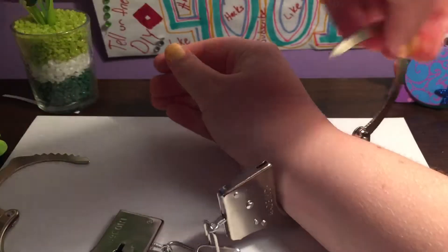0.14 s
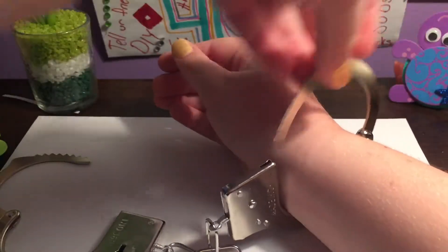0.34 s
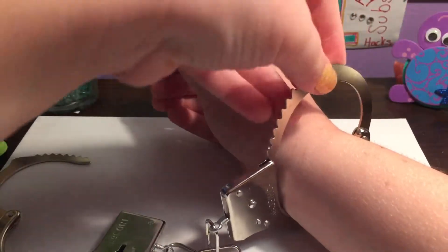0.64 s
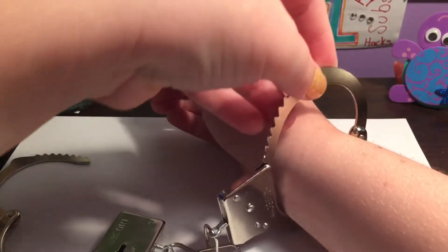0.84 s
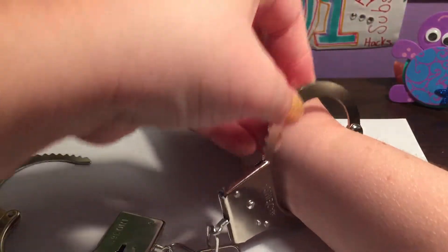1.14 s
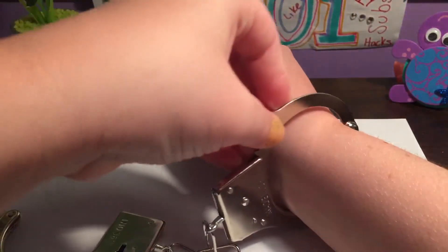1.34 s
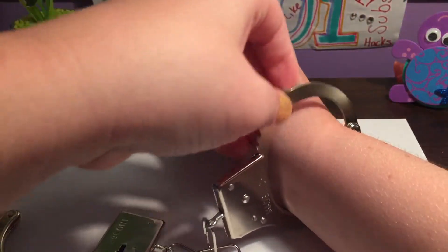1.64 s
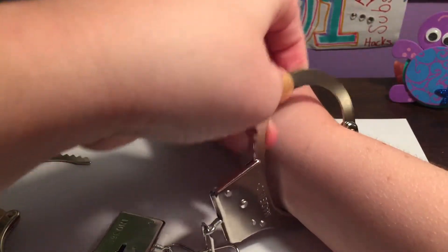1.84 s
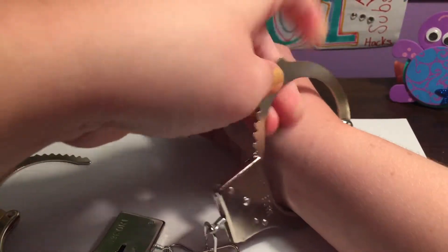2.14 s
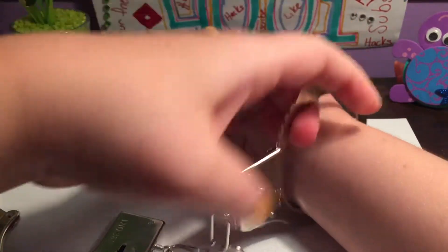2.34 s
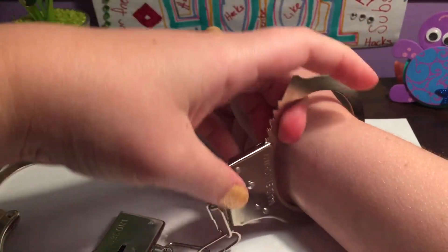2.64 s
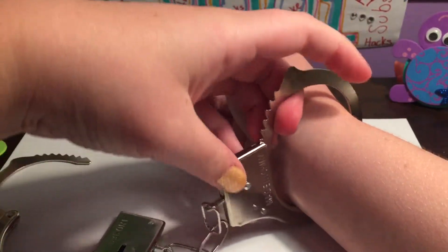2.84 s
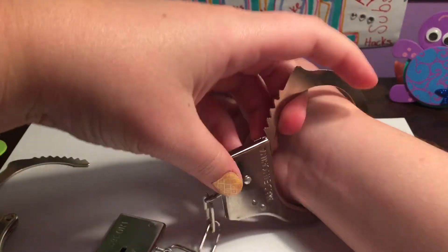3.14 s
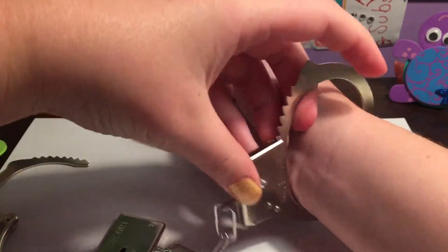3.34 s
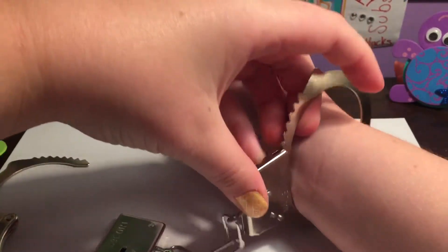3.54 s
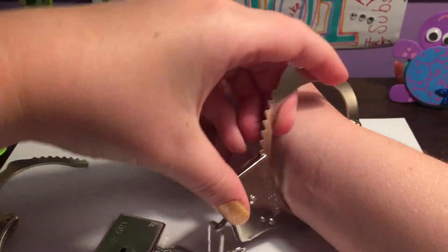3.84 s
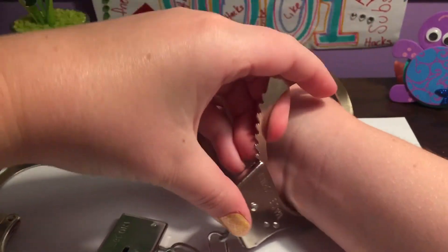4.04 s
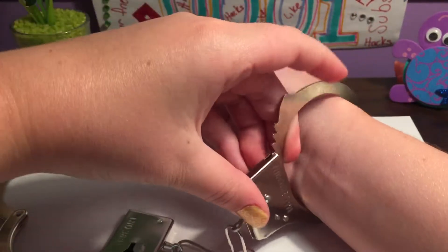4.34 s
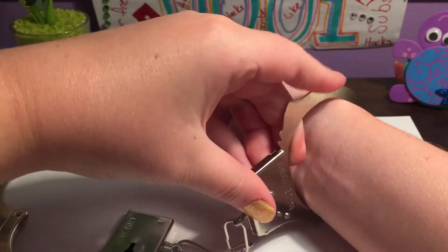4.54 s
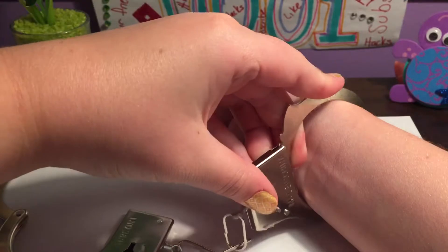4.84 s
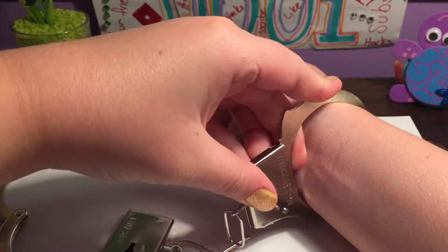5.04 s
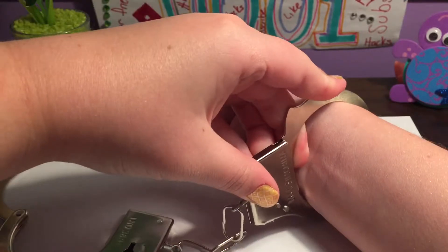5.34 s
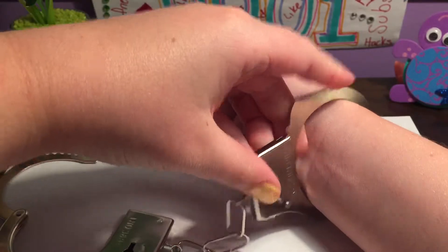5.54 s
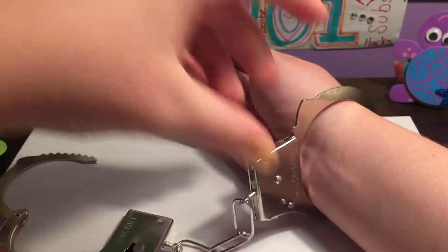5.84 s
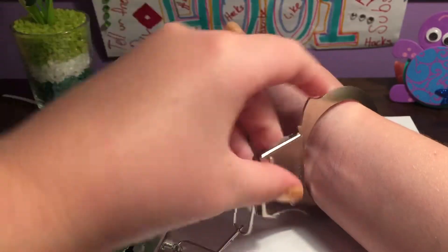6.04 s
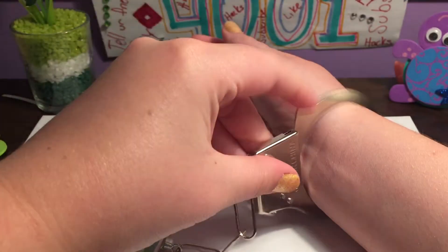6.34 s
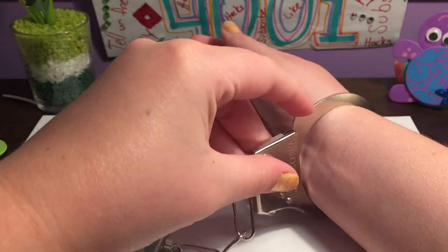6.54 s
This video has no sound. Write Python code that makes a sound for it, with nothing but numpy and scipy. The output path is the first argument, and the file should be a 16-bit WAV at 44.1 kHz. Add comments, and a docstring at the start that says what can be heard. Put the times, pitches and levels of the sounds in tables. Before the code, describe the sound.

Close-up metal clicking and chain rattling as a toothed cuff is ratcheted shut, with a loud snap and later a second, in a quiet humming room.

```python
"""A small room with a desk: steel handcuffs are closed round a wrist, close to the listener.
The toothed bow scrapes and squeaks by stick-slip; pawl and lock case click, clack and twice snap home
hard, as noise bursts over decaying modes. Chain links clink in chattering bounces or sing on one note,
and dull knocks excite the desk. Behind them are filtered fan noise with a wavering low hum
and a faint low rumble that comes and goes."""
import sys
import numpy as np
from scipy import signal
from scipy.fft import rfft, irfft, next_fast_len
from scipy.io import wavfile
from scipy.ndimage import uniform_filter1d, map_coordinates

SR = 44100
rng = np.random.default_rng(int(sys.argv[2]) if len(sys.argv) > 2 else 0)


def put_to_file(sound):
    """Save the sound as 16-bit audio at rate SR, in the file named by the first command-line argument."""
    columns = np.atleast_2d(sound).T  # one column per channel
    safe = np.clip(columns, -1, 1)
    whole_steps = np.round(safe * 32767)
    wavfile.write(sys.argv[1], SR, whole_steps.astype(np.int16))


N = 295911

# modes of lock case and bow: (frequency [Hz], relative level [dB], t60 before damping [s])
CASE_MODES = [(943, -15.5, 0.05), (1320, 4, 0.039), (1570, -2.5, 0.069), (1845, -0.5, 0.087),
              (2425, -3, 0.067), (3110, -7.5, 0.074), (4045, -6, 0.043), (4040, 0.5, 0.044),
              (4490, 0.5, 0.0408), (5310, -4, 0.059), (5470, -13, 0.044), (6190, -10, 0.05),
              (7020, -3.5, 0.058), (6850, -11, 0.0537), (7340, -6.5, 0.055), (8500, 2, 0.037),
              (8940, -0.5, 0.0509), (9110, 5, 0.037), (9400, -5, 0.038), (9550, -3, 0.039),
              (9800, 1, 0.045), (11130, -8, 0.044), (11360, 0.5, 0.039), (12300, 3.5, 0.034),
              (13300, -3.5, 0.039), (13070, -8, 0.038), (15290, -5, 0.037)]
# spectrum of the crack of steel on steel: (frequency [Hz], relative density [dB per Hz])
CRACK_SPECTRUM = [(200, 2.5), (700, 4.5), (1100, 4), (1400, 6.5), (2300, 3), (3000, -3.5), (4000, 1),
                  (7000, 3.5), (9500, 0), (13000, -1.5), (16000, 1)]


def amp(db):
    """Amplitude ratio: 20 dB correspond to a factor of ten."""
    return 10 ** (np.asarray(db) / 20)


def unit(x):
    """Normalization by mean power: x at rms 1."""
    return x / np.sqrt(np.mean(x ** 2) + 1e-20)


def crest(x, size=88):
    """Normalization by short-time power: the loudest two milliseconds have rms 1."""
    return x / np.sqrt(uniform_filter1d(x ** 2, size, mode="constant").max())


def along(points, hz):
    """Interpolation of (frequency [Hz], value) points on a logarithmic frequency axis."""
    f, v = np.transpose(points)
    return np.interp(np.log(hz + 1), np.log(f + 1), v)


def filtered(x, response):
    """Linear filtering: the spectrum of x times a response of frequency."""
    m = next_fast_len(len(x) + SR // 10, real=True)
    spectrum = rfft(x, m) * response(np.fft.rfftfreq(m, 1 / SR))
    return irfft(spectrum, m)[:len(x)]


def noise(response, size):
    """Coloured noise: white noise shaped by a response, at rms 1."""
    return unit(filtered(rng.standard_normal(size), response))


def fade(t, t60):
    """Exponential damping: a decay of 60 dB in t60 seconds."""
    return np.exp(-np.log(1000) * t / max(t60, 1e-3))


def ring(modes, t, scatter_db):
    """Modal superposition: a blow at a new spot gives each mode a new strength and phase."""
    total = np.zeros(len(t))
    for hz, db, t60 in modes:
        strength = amp(db + scatter_db * rng.standard_normal())
        total += strength * fade(t, t60) * np.sin(2 * np.pi * (hz * t + rng.random()))
    return total


def rough_ring(hz, t, t60, waver_hz):
    """Frequency modulation: the ring of a loose part wavers as it chatters against its seat."""
    pitch = hz + waver_hz * noise(lambda f: 1 / (1 + (f / 300) ** 4), len(t))
    return np.sin(2 * np.pi * np.cumsum(pitch) / SR) * fade(t, t60)


def spot(depth_db, size=72):
    """Modal selectivity: every contact spot on the steel favours other resonances."""
    ripple_db = depth_db * np.clip(rng.standard_normal(size), -1.8, 1.8)
    grid_hz = np.linspace(0, SR / 2, size)

    def colour(hz):
        ripple = np.interp(hz, grid_hz, ripple_db) * hz / (hz + 1000)  # flatter in the bass
        return amp(along(CRACK_SPECTRUM, hz) + ripple)
    return colour


def wobble(knots_per_s):
    """Slow random modulation: a smooth curve through random knots."""
    knots = np.arange(N) * knots_per_s / SR
    return map_coordinates(rng.standard_normal(int(knots[-1]) + 4), [knots])


def smooth_field(shape, bands, frames):
    """Correlated fluctuation: a random field smoothed over frequency and time, at rms 1."""
    over_bands = uniform_filter1d(rng.standard_normal(shape), size=bands, axis=0)
    return unit(uniform_filter1d(over_bands, size=frames, axis=1))


def patchy(x, depth_db):
    """Turbulent modulation: noise whose bands swell and sink independently."""
    z = signal.stft(x, nperseg=1024)[2]
    eddies = smooth_field(z.shape, bands=4, frames=9)
    return signal.istft(z * amp(depth_db * eddies), nperseg=1024)[1][:N]


def add(track, s, sound):
    """Superposition: mix a sound in at s seconds."""
    part = track[max(round(s * SR), 0):][:len(sound)]
    part += sound[:len(part)]


def in_room(x, wet_db):
    """Reverberation: a diffuse tail, damped by frequency, builds up over a few milliseconds."""
    # reverberation of the room: (frequency [Hz], t60 [s])
    room_decay = [(200, 0.43), (1500, 0.22), (6000, 0.21), (15000, 0.135)]
    hz, t, z = signal.stft(rng.standard_normal(SR // 3), SR, nperseg=256)
    decay = amp(-60 * t / along(room_decay, hz)[:, None])
    tail = signal.istft(z * decay * (1 - np.exp(-t / 0.0017)), SR, nperseg=256)[1]
    return x + amp(wet_db) * signal.fftconvolve(x, tail / np.linalg.norm(tail))[:len(x)]


def rumble():
    """Modulated narrow-band noise: a faint low rumble comes and goes."""
    mean_db, swing_db = -58, 3
    # course of the rumble before its random swing: (time [s], level against mean_db [dB])
    rumble_course = [(0, 3), (.3, 4.5), (.5, -3), (1.15, -10), (1.5, 1), (2.349, 6.5), (2.75, -3), (3.2, 6),
                     (3.45, -18), (3.9, 6), (5.4, -0.5), (6.7, 5.5)]
    course_db = np.interp(np.arange(N) / SR, *np.transpose(rumble_course))
    level_db = mean_db + course_db + swing_db * wobble(knots_per_s=4)
    # (frequency [Hz], relative density [dB per Hz])
    spectrum = [(20, -45.0), (40, -15.5), (57, 7.5), (74, -8.0), (95, 7), (140, -30.5), (400, -97.5)]
    return amp(level_db) * noise(lambda hz: amp(along(spectrum, hz)), N)


def fan():
    """Resonant flow noise: moving air hums in a few resonances, and its lowest hum wavers."""
    # rush of the fan: (frequency [Hz], relative density [dB per Hz])
    air_spectrum = [(20, -57), (56, -30), (80, -32.5), (110, -7), (165, 0), (250, -0.5), (360, -6.5),
                    (560, -18.5), (1000, -24), (1400, -28), (2400, -30.5), (3100, -35), (6000, -42.5),
                    (11000, -50.5), (16000, -54.5)]
    # resonances that the air excites: (frequency [Hz], width [Hz], lift [dB])
    duct_modes = [(107, 5.2, 6), (168.3, 33.6, 6), (342.8, 36, 9.5), (434.7, 19.4, 10), (670, 14, 6),
                  (872.4, 63.4, 15.5), (1001.4, 28, 13.5), (1670, 64, 8.5), (1862, 76, 16), (2182, 46, 11),
                  (2372, 35, 11.5), (2470, 90, 6)]

    def response(hz):
        lift_db = sum(db / (1 + (2 * (hz - c) / w) ** 2) for c, w, db in duct_modes)
        return amp(along(air_spectrum, hz) + lift_db)

    air = amp(-41.5) * unit(patchy(noise(response, N), depth_db=1.66))
    low = filtered(air, lambda hz: 1 / (1 + (hz / 230) ** 8))
    return air - low + low * amp(-0.8 * wobble(knots_per_s=13))


def knocks():
    """Damped impact: flesh softens the cuff's blow to wrist and desk; a heavy push thumps the arm."""
    # dull knocks: (time [s], relative level [dB], relative weight of the low thump [dB],
    # t60 of the hand's damping [s], softness cut-off [Hz])
    knock_events = [(3.566, -18.5, -15.5, 0.032, 720), (3.5765, -32, -12, 0.045, 560),
                    (4.739, -33, -10, 0.06, 500), (4.912, -28, 1, 0.16, 420),
                    (6.404, -21.5, -7.5, 0.15, 1100)]
    # modes of wrist and desk: (frequency [Hz], relative level [dB], t60 before damping [s])
    desk_modes = [(169.7, -9.5, 0.059), (261, -3, 0.045), (327, 6, 0.026), (451, -6.5, 0.022),
                  (526, -4.5, 0.25), (915, -2, 0.037), (1370, -3.5, 0.048)]
    out, t = np.zeros(N), np.arange(SR // 3) / SR
    for s, db, weight_db, t60, soft_hz in knock_events:
        thud = ring(desk_modes, t, scatter_db=1) * fade(t, t60) * (1 - np.exp(-t / .0015))
        soft_band = signal.butter(2, [140, soft_hz], "band", fs=SR, output="sos")
        thud = signal.sosfilt(soft_band, thud)
        thump = np.sin(2 * np.pi * 82 * t) * fade(t, 0.13) * (1 - np.exp(-t / 0.0074))
        knock = crest(thud) + amp(weight_db - 0.5) * thump
        add(out, s, amp(db - 0.5) * in_room(knock, wet_db=-14.0))
    return out


def pings():
    """Free vibration: a link that hangs clear of its neighbours rings on, nearly pure."""
    # singing links: (time [s], frequency [Hz], level [dB], t60 [s])
    ping_events = [(2.335, 8240, -53, .15), (2.51, 7028, -39, 0.19), (2.51, 9000, -42, 0.14),
                   (3.882, 5200, -56, 0.22), (4.057, 7500, -48, 0.26), (6.162, 8180, -48, 0.15)]
    out, t = np.zeros(N), np.arange(SR // 3) / SR
    for s, hz, db, t60 in ping_events:
        ping = rough_ring(hz, t, t60, waver_hz=25) * (1 - np.exp(-t / .001))
        add(out, s, amp(db) * ping)
    return out


def stirs():
    """Irregular excitation: the moving hand stirs links; rows of (time [s], level [dB], brightness [dB])."""
    # spells of stirring: (start [s], length [s], relative level before scatter [dB])
    stir_spells = [(3.858, 0.15, -46), (4.014, 0.32, -46.5), (4.493, 0.22, -52)]
    touches_per_s, scatter_db, bright_db = 22, 5.5, -18
    touches = []
    for start, length, db in stir_spells:
        count = max(round(length * touches_per_s), 1)
        for k, (late, strength) in enumerate(rng.random((count, 2))):
            s = start + length * (k + late) / count
            touches.append((s, db + scatter_db * (2 * strength - 1), bright_db))
    return touches


def chain():
    """Repeated impact: a link lands, then chatters on its neighbours in ever weaker bounces."""
    # links falling on each other: (time [s], relative level [dB], weight of the brightness curve [dB])
    clink_events = [(0.1, -44, 10), (0.111, -38.5, 8), (0.15, -47.5, 13), (0.229, -48.5, 3),
                    (2.495, -27, 13), (2.508, -21, 0), (2.5255, -24.5, 3), (2.975, -27, 15),
                    (3.021, -42, -31), (3.177, -32, -5), (3.189, -32, 4), (3.198, -25.5, 1),
                    (3.214, -26, 13), (3.479, -38, -2), (3.5362, -36, 1), (3.569, -35, -15),
                    (3.58, -33.5, -5), (3.836, -40, 3), (3.88, -40.5, 8), (4.02, -38, 5), (4.282, -41, 13),
                    (4.583, -46.5, -14), (5.508, -49.5, -5), (5.6365, -36, -12), (5.793, -52, 9),
                    (6.1609, -23, 13), (6.1654, -24.5, 10), (6.201, -38, 7), (6.565, -55, 9)]
    # modes of the links: (frequency [Hz], relative level [dB], t60 before damping [s])
    link_modes = [(4230, 1, 0.28), (4350, 3, 0.15), (5060, 7, 0.2), (5530, -22, .1), (6300, 8.5, 0.094),
                  (6660, 1, 0.075), (7028, 5.5, 0.18), (7500, -12, 0.56), (8040, 14.5, 0.055),
                  (8150, -12.5, 0.057), (8600, -5, .053), (9300, 2, 0.07), (9370, 7, 0.085),
                  (9700, -7, .05), (11500, 0.5, 0.15), (12200, -7, .1), (12700, 3, 0.057), (13600, -6, .13),
                  (13950, 4, .1), (14500, -11, .033)]
    rattle_s = .029  # all bounces fall within this time
    damp_t60_s = 0.15  # links lie against each other and the hand, which shortens their ring
    # (frequency [Hz], share of the brightness weight)
    brightness = [(3800, -0.12), (6300, 0.42), (12500, 0.7), (16000, 0.21)]
    out, t = np.zeros(N), np.arange(SR // 5) / SR
    for s, db, bright_db in clink_events + stirs():
        clink = np.zeros(len(t))
        for late in np.append(0, rng.random(size=6)):
            colour = spot(depth_db=4)
            tick = noise(lambda hz: colour(hz) * hz / (hz + 3000), len(t)) * fade(t, 0.036)
            tuning = 1 + .012 * rng.standard_normal()  # neighbouring links differ slightly
            tone = ring(link_modes, t * tuning, scatter_db=4) * fade(t, damp_t60_s)
            contact = crest(tone) + amp(2.5) * crest(tick)
            bounce_db = -12 * late - 5.6 * (late > 0)
            add(clink, late * rattle_s, amp(bounce_db) * contact)
        # a glancing touch is brighter than a flat one
        clink = filtered(clink, lambda hz: amp(bright_db * along(brightness, hz)))
        add(out, s, amp(db - 8.5) * crest(in_room(clink, wet_db=-15.5)))
    return out


def stroke(t, length):
    """Contact pressure: a push takes hold, swells to its peak and lets go."""
    grip_s, swell_db, release_t60_s = 0.006, 15, 0.11
    swell = amp(swell_db * (np.clip(t / length, 0, 1) - 1))
    return np.clip(t / grip_s, 0, 1) * swell * fade(np.maximum(t - length, 0), release_t60_s)


def scrape(slips_per_s=800, spread_db=5, jerk_db=2.0):
    """Sliding friction: steel advances on steel in tiny uneven slips that ring the bow."""
    # strokes of the bow in the lock case: (start [s], length of the push [s], relative level [dB])
    scrape_strokes = [(1.09, 0.045, -55), (1.139, 0.004, -50), (1.15, 0.032, -51.5), (1.183, .011, -51),
                      (1.204, 0.028, -43), (1.24, 0.0084, -54), (1.635, 0.059, -51), (1.868, 0.03, -38.5),
                      (1.895, 0.017, -52), (2.345, 0.026, -37.5), (2.385, 0.024, -43.5),
                      (3.145, 0.038, -41), (3.2, 0.04, -47), (3.948, 0.019, -50), (4.045, 0.036, -45.5),
                      (4.135, 0.027, -56), (4.21, 0.078, -53.5), (4.873, 0.0097, -51)]
    # resonances of the sliding bow: (frequency [Hz], width [Hz], relative level [dB])
    bow_modes = [(1870, 400, -12.5), (4500, 380, 4.5), (4820, 300, 4.5), (4910, 280, -3.5), (5530, 270, -9),
                 (6560, 120, -21.5), (7000, 200, -7), (8000, 188, -5.5), (8500, 550, -6.5), (9630, 150, 0),
                 (11440, 140, -6), (12300, 380, -10.5), (13270, 350, -4), (14150, 250, -16.5),
                 (15580, 200, -24)]
    t = np.arange(N) / SR
    pressure = sum(amp(db) * stroke(t - s, length) for s, length, db in scrape_strokes)
    jerks = amp(jerk_db * noise(lambda hz: 1 / (1 + (hz / 50) ** 4), N))  # the bow advances in fits
    slip_strength = amp(spread_db * np.clip(rng.standard_normal(N), -2, 1.5))
    slips = (rng.random(N) < slips_per_s / SR) * slip_strength
    rub = jerks * (unit(slips) + .3 * rng.standard_normal(N))

    def bow_response(f):
        total = 0
        for k, (c, w, db) in enumerate(bow_modes):
            # neighbouring modes move in opposite phase
            total = total + (-1) ** k * amp(db) * 1j * f * w / (c * c - f * f + 1j * f * w)
        return total

    grit = unit(filtered(rub, lambda hz: amp(along(CRACK_SPECTRUM, hz))))
    rasp = unit(filtered(rub, bow_response)) + amp(-3.5) * grit
    # the contact point travels, so the resonances keep trading strength
    z = signal.stft(rasp, nperseg=256)[2]
    drift = smooth_field(z.shape, bands=3, frames=7)
    rasp = signal.istft(z * amp(3.5 * drift), nperseg=256)[1][:N]
    return in_room(amp(-2.0) * pressure * unit(rasp), wet_db=-11)


def squeaks(width_hz=200):
    """Stick-slip oscillation: short gritty squeals sink and weaken as the bow slows."""
    # squeals: (time [s], length [s], starting pitch [Hz], share of the pitch lost [1], relative level [dB])
    squeak_events = [(1.867, 0.047, 4770, 0.04, -44.5), (1.926, 0.021, 3570, 0.084, -47),
                     (2.367, 0.033, 4300, 0.054, -43), (2.386, 0.021, 3800, .08, -47),
                     (2.405, 0.036, 3270, .07, -45.5), (4.28, 0.055, 4360, 0.071, -54),
                     (4.339, .02, 4230, .03, -53.5)]
    weaken_db, chatter_depth_db = 10, 0.5
    out = np.zeros(N)
    for s, length, start_hz, sag, db in squeak_events:
        u = np.linspace(0, 1, round(length * SR))
        pitch = start_hz * (1 - sag * np.sin(np.pi * u / 2))
        phase = 2 * np.pi * np.cumsum(pitch) / SR
        grip = noise(lambda hz: 1 / (1 + (hz / width_hz) ** 2), len(u))
        chatter_db = chatter_depth_db * noise(lambda hz: 1 / (1 + (hz / 200) ** 4), len(u))
        envelope = amp(db - weaken_db * u) * 2 * np.sqrt(u * (1 - u))
        add(out, s, envelope * unit(grip * amp(chatter_db)) * np.sin(phase))
    return out


def clacks():
    """Paired resonance: a tap or levering of the bow rings the hollow case on two wavering pitches."""
    # taps: (time [s], lower ring [Hz], upper ring [Hz], level of each ring [dB], t60 [s])
    clack_events = [(1.1425, 4550, 5440, -46, 0.032), (2.37, 4210, 4920, -35.5, .05),
                    (2.493, 1440, 2510, -22.5, 0.021), (2.504, 2460, 3160, -41.5, 0.084),
                    (3.61, 3600, 4150, -48, 0.048), (3.93, 4180, 6500, -44.5, 0.033),
                    (3.961, 1226, 1900, -47, 0.11), (4.007, 1250, 2690, -28.5, 0.024),
                    (4.043, 1590, 2770, -53, .07), (4.132, 4500, 6900, -45, 0.036),
                    (4.176, 4600, 9300, -49, 0.037), (4.877, 1490, 1977, -40, 0.046),
                    (6.08, 4060, 8740, -43, 0.023), (6.1055, 4040, 5308, -41, 0.055),
                    (6.1127, 4005, 5350, -38.5, .045), (6.131, 4005, 5340, -47, 0.033),
                    (6.2, 4200, 5308, -48, .05)]
    out, t = np.zeros(N), np.arange(SR // 5) / SR
    for s, lower_hz, upper_hz, db, t60 in clack_events:
        clack = sum(rough_ring(hz, t, t60, waver_hz=130) for hz in (lower_hz, upper_hz))
        add(out, s, amp(db) * in_room(clack * (1 - np.exp(-t / .001)), wet_db=-14.0))
    return out


def ratchet():
    """Impact excitation: each click is a dense crack plus the ring of the case, damped by the hand."""
    # pawl and bow striking the case: (nominal time [s], relative level [dB], relative level of the body
    # [dB], t60 of the crack's slower part [s], weight of the brightness curve [dB])
    click_events = [(0.094, -49.5, 11, 0.044, -6), (0.462, -35, -6.5, 0.038, 5), (1.215, -38, -22, 0.03, 7),
                    (1.87, -31.5, -20, .02, 9), (1.888, -40, -16, .02, -3), (1.9246, -28, -8, 0.055, -6),
                    (2.2497, -20.5, -21, 0.02, 2.5), (2.3706, -25.5, -39, 0.055, -1),
                    (2.4905, -25, -7.5, 0.081, -27), (2.6698, -27.5, -13, 0.025, -13),
                    (2.6811, -34, -1.5, 0.067, -10), (2.69, -36.5, -9, 0.02, -4),
                    (2.852, -31.5, -16, 0.0086, -15), (2.9067, -23, -30, 0.0092, -12.5),
                    (3.186, -19, -24, 0.024, -10), (3.294, -33.5, -27, .025, 0),
                    (3.6104, -39, -13, 0.05, -26), (3.6789, -36.5, -27, 0.09, -3),
                    (3.929, -33, -14, .03, 0), (3.966, -32, -13, .035, -2),
                    (4.0057, -22.5, -4.5, 0.032, -8), (4.06, -36, -8, .015, -6),
                    (4.066, -38, -16, .012, -5), (4.074, -35, -18, .015, 0), (4.095, -34, -16, 0.018, -4),
                    (4.13, -30, -26, 0.017, 1), (4.173, -37.5, -27, 0.018, -7), (4.255, -45, -17, .03, 5),
                    (4.436, -51.5, -15, .03, -15), (4.7357, -18.5, -15.5, 0.033, -11),
                    (4.8437, -24.5, -7.5, 0.05, -6.5), (5.608, -18, -14, 0.04, -7),
                    (6.079, -29.5, -23, 0.017, -8), (6.104, -31, -19, 0.032, -10),
                    (6.113, -29.5, -9.5, 0.033, -14), (6.128, -25, -17, 0.077, 4),
                    (6.252, -43, -20, .02, -3), (6.392, -36, -5, 0.11, -5.5)]
    climb_db = -27  # the pawl's rub, against the click's tabled level
    brightness = [(4500, 0.12), (9000, 0.71)]  # (frequency [Hz], share of the brightness weight)
    out, t = np.zeros(N), np.arange(SR // 4) / SR
    for s, db, body_db, t60, bright_db in click_events:
        colour = spot(depth_db=3.5)
        crack = noise(colour, len(t)) * (fade(t, t60) + fade(t, 0.0103))
        steel = ring(CASE_MODES, t, scatter_db=1.5) * fade(t, 3 * t60)
        click = (crest(crack) + amp(-5) * crest(steel)) * (1 - np.exp(-t / .0004))
        # a firm push moves the whole case; a sharp edge brings out the highest ring
        body = filtered(click, lambda hz: 1 / (1 + (hz / 2500) ** 6))
        edge = filtered(click - body, lambda hz: amp(bright_db * along(brightness, hz)))
        strike = crest(edge) + amp(body_db + 5.5) * crest(body)
        add(out, s + .0005, amp(db - 10.0) * in_room(strike, wet_db=-13.5))
        # the pawl rubs up the tooth just before it drops
        climb = np.linspace(0, 1, SR // 125)
        rub = climb ** 2 * noise(colour, len(climb))
        add(out, s - len(climb) / SR, amp(db + climb_db) * rub)
    return out


def snaps():
    """Impact and rebound: the lock slams home; case and pawl ring roughly while loose parts buzz on."""
    # slams: (time [s], relative level [dB], weight of the brightness curve [dB], weight of the hollowness
    # curve [dB], rebound delay [s], rebound level [dB], ring of the case [Hz], its relative level [dB],
    # ring of the pawl [Hz], its relative level [dB])
    slam_events = [(4.9095, -6, -0.5, -3, 0.0037, -6.5, 1869, -11, 9670, -16.5),
                   (6.4006, -11, -1, 1.5, 0.0055, -3, 1355, -10.5, 8940, 0)]
    # the bright crash before its weighting: (frequency [Hz], relative density [dB per Hz])
    crash_spectrum = [(200, -7.5), (530, -3), (680, -3), (1050, -1.5), (1350, -4.5), (2100, -6),
                      (2700, -8.5), (3900, -0.5), (4500, -5.5), (4950, -7), (5300, 3.5), (6100, -2),
                      (7000, 4.5), (7900, -4), (8700, 5), (9800, 3.5), (10600, -8), (11400, 3), (13500, 2),
                      (14300, -4), (15600, 2.5)]
    # loose parts buzzing on: (frequency [Hz], relative density [dB per Hz])
    clatter_spectrum = [(200, -15.5), (900, -9), (1500, -4), (2200, 3), (3000, -1), (4200, -1.5),
                        (4800, -2), (5500, 2.5), (7200, 2.5), (9000, -4.5), (11000, -6), (13500, -2.5),
                        (16000, -6.5)]
    crash_t60_s, clatter_t60_s, impact_t60_s = 0.01904, 0.15, 0.00535
    case_t60_s, pawl_t60_s = .06, 0.03
    clatter_db, impact_db, steel_db = -25.5, 0.5, -10
    settle_db = -18  # a second, weaker rebound against the first
    upper_ratio, upper_db = 1.105, -1.5  # the pawl's second ring, against its first
    out, t = np.zeros(N), np.arange(SR // 4) / SR
    for s, db, bright_db, hollow_db, rebound_s, rebound_db, case_hz, case_db, pawl_hz, pawl_db in slam_events:
        def colour(hz):
            bright = bright_db * along([(3000, 0), (12000, 0.92)], hz)
            hollow = hollow_db * along([(1100, 0.97), (1600, 0.026)], hz)
            return amp(along(crash_spectrum, hz) + bright + hollow)

        clatter = noise(lambda hz: amp(along(clatter_spectrum, hz)), len(t))
        snap = amp(clatter_db) * clatter * fade(t, clatter_t60_s)
        blows = [(0, 0), (rebound_s, rebound_db), (2 * rebound_s, rebound_db + settle_db)]
        for late, level_db in blows:
            crash = noise(colour, len(t)) * fade(t, crash_t60_s)
            add(snap, late, amp(level_db) * crest(crash))
        # the first hard contact is nearly all treble
        impact = noise(lambda hz: colour(hz) * hz ** 2, len(t)) * fade(t, impact_t60_s)
        snap += amp(impact_db) * crest(impact)
        snap += amp(steel_db) * crest(ring(CASE_MODES, t, scatter_db=4))
        snap += amp(case_db) * rough_ring(case_hz, t, case_t60_s, waver_hz=69.3)
        for hz, ring_db in [(pawl_hz, pawl_db), (upper_ratio * pawl_hz, pawl_db + upper_db)]:
            snap += amp(ring_db) * rough_ring(hz, t, pawl_t60_s, waver_hz=265)
        snap = crest(snap * (1 - np.exp(-t / .0002)))
        add(out, s, amp(db) * in_room(snap, wet_db=-17.5))
    return out


def scene():
    """Superposition of sources: the cuffs in front of the room's hum, as one channel."""
    background = fan() + rumble()
    links_and_wrist = chain() + pings() + knocks()
    sliding = scrape() + squeaks()
    lock = ratchet() + snaps() + clacks()
    return (background + links_and_wrist + sliding + lock)[None]


def record(dry):
    """Band limitation: the deepest bass is thinned and the top of the treble cut off steeply."""
    thin = signal.sosfilt(signal.butter(2, 30, "high", fs=SR, output="sos"), dry)
    top_hz = 15900
    return signal.sosfilt(signal.cheby1(12, .2, top_hz, fs=SR, output="sos"), thin)


dry = scene()
out = record(dry)
put_to_file(out)
```